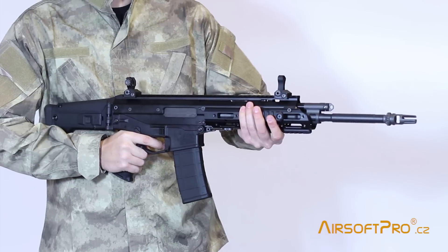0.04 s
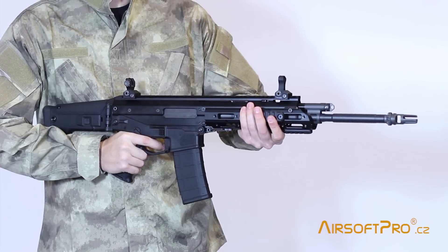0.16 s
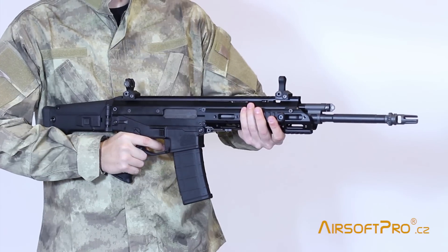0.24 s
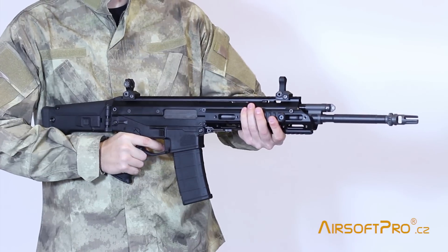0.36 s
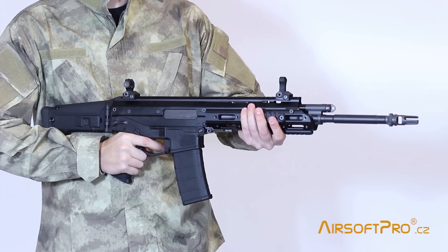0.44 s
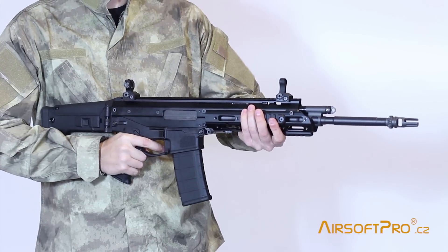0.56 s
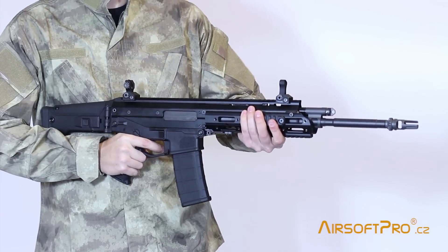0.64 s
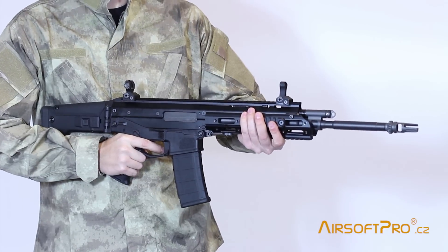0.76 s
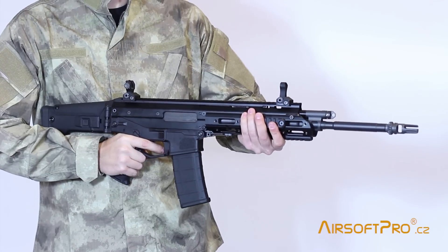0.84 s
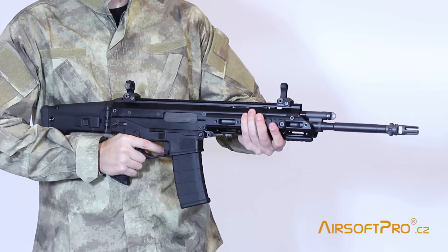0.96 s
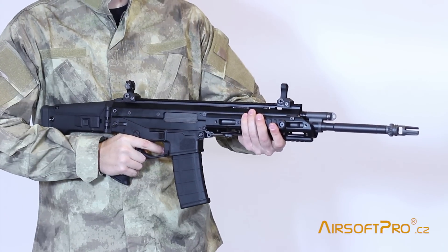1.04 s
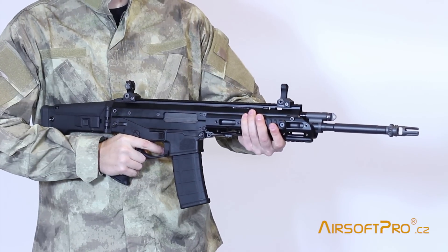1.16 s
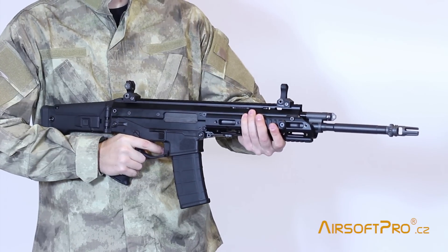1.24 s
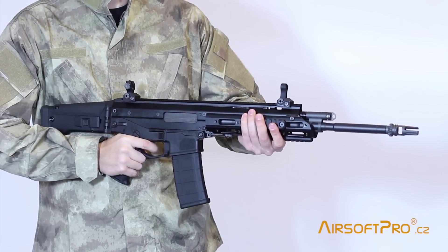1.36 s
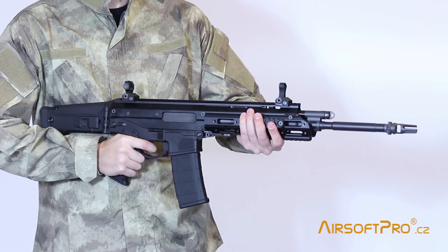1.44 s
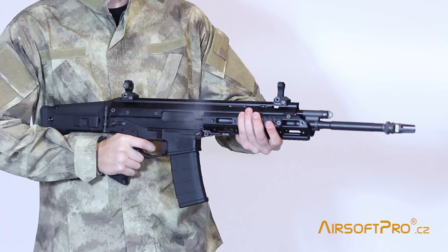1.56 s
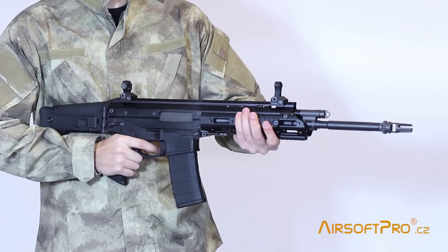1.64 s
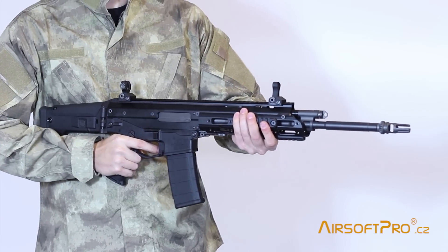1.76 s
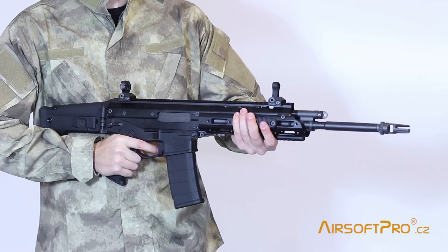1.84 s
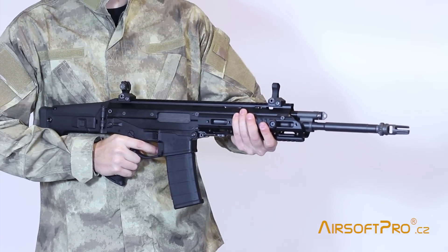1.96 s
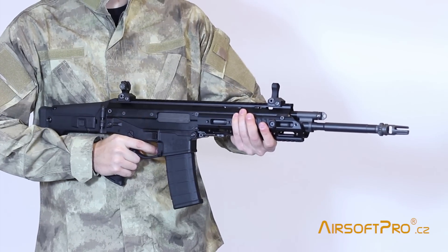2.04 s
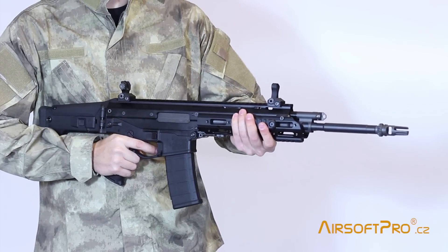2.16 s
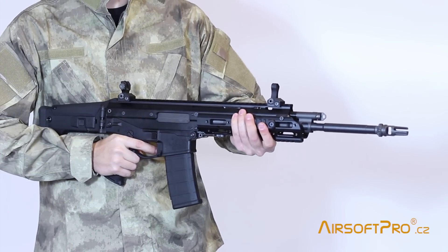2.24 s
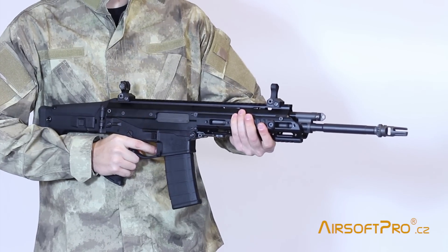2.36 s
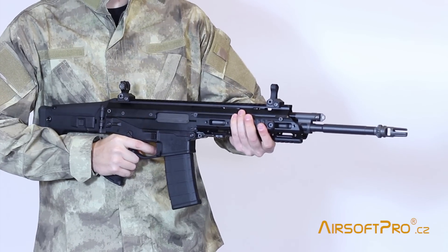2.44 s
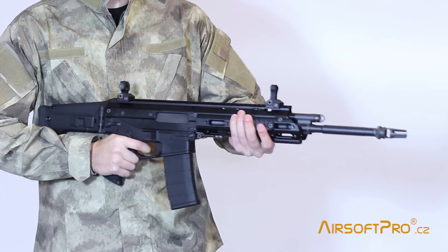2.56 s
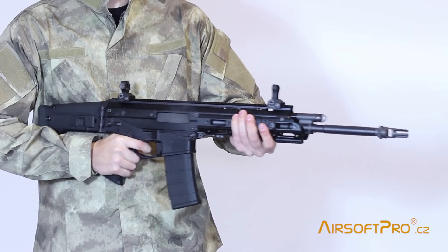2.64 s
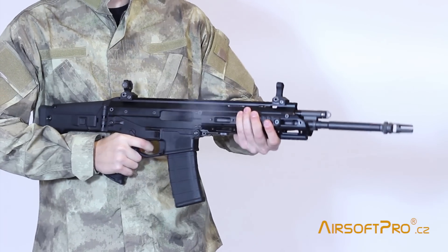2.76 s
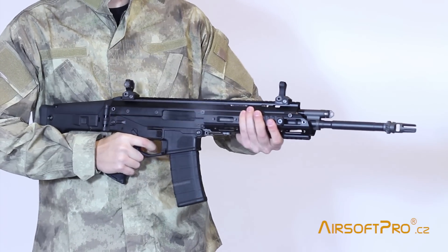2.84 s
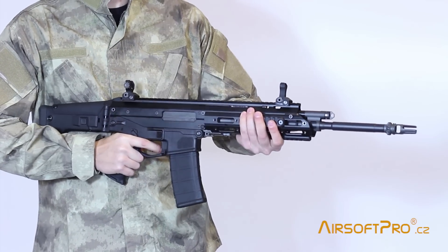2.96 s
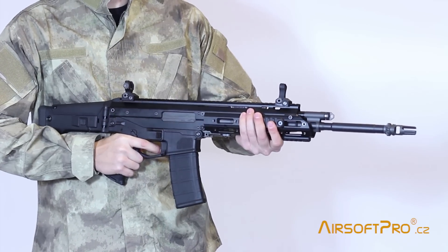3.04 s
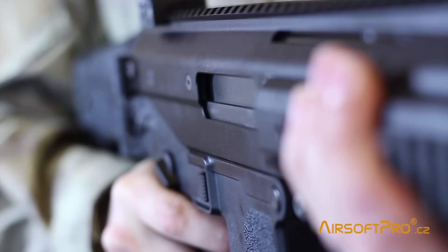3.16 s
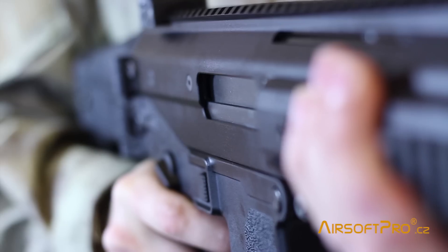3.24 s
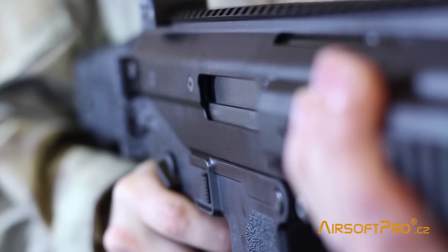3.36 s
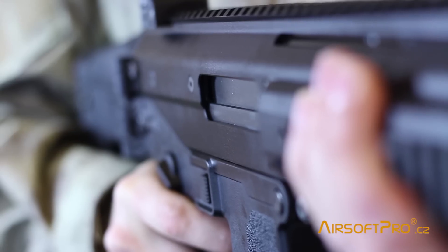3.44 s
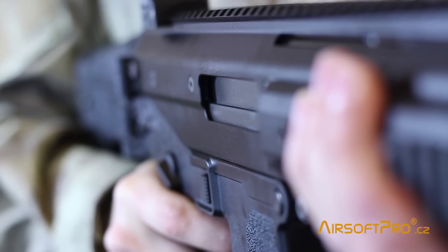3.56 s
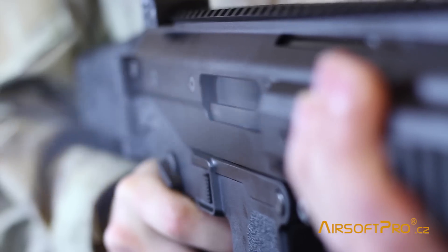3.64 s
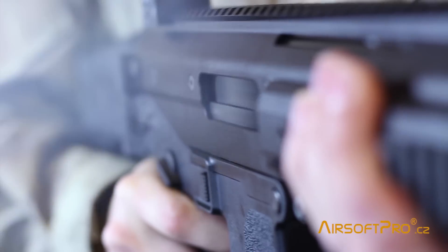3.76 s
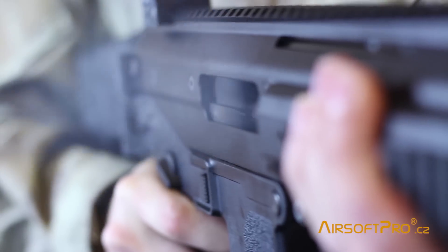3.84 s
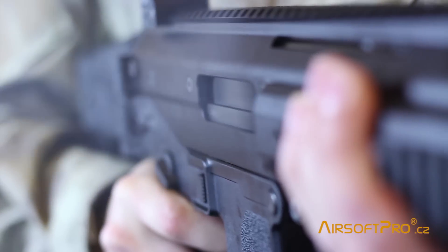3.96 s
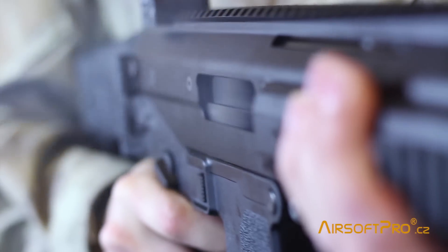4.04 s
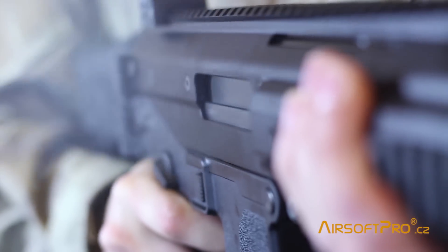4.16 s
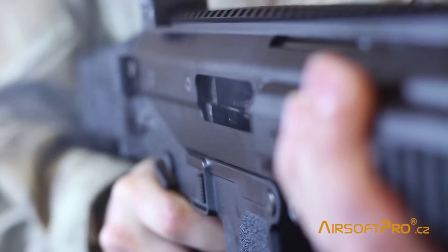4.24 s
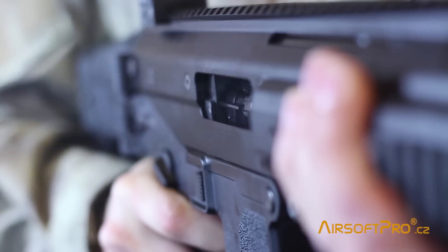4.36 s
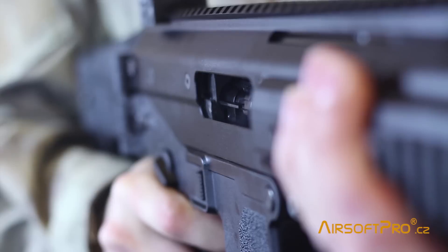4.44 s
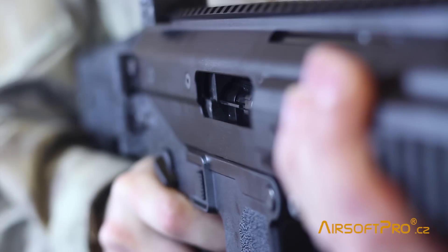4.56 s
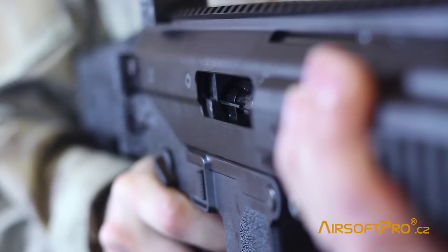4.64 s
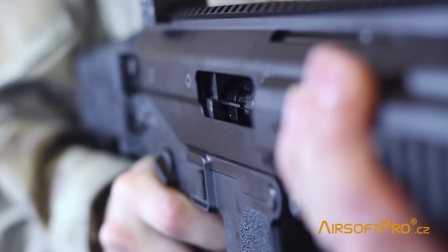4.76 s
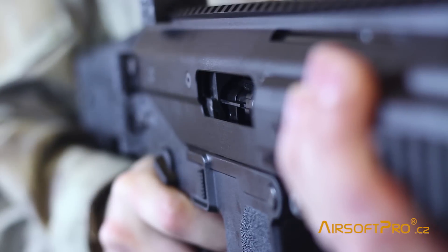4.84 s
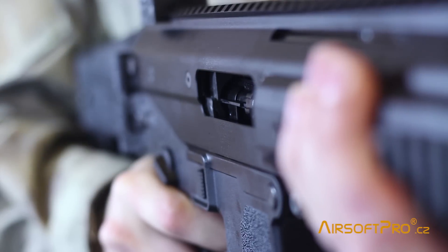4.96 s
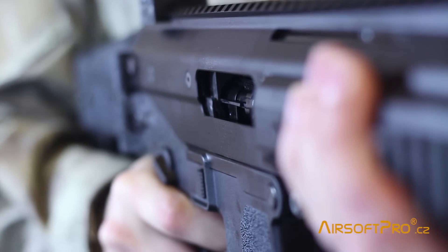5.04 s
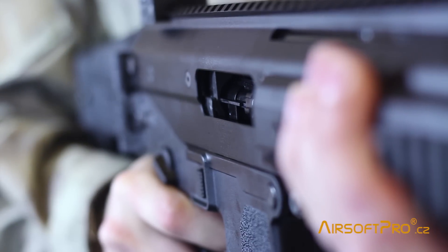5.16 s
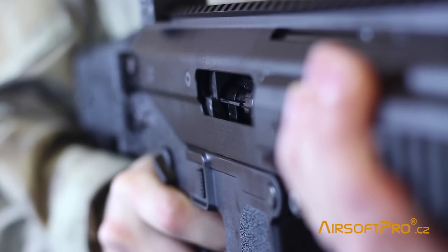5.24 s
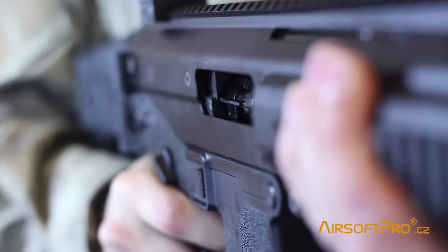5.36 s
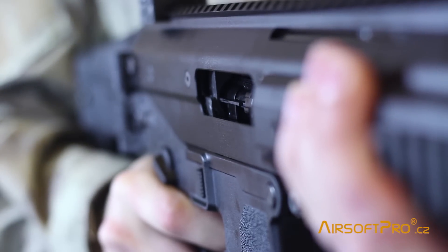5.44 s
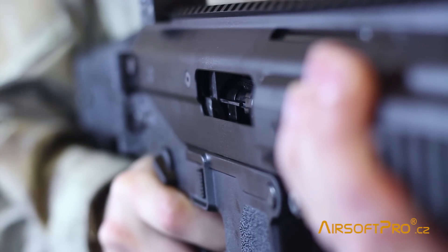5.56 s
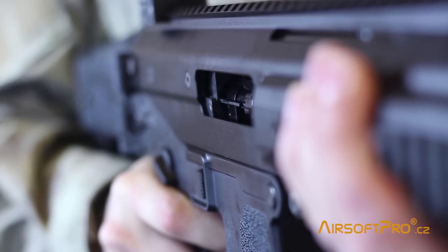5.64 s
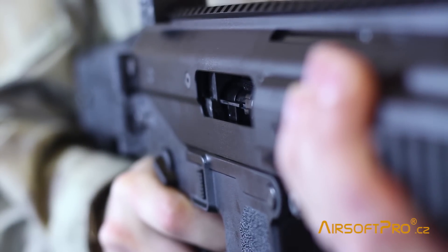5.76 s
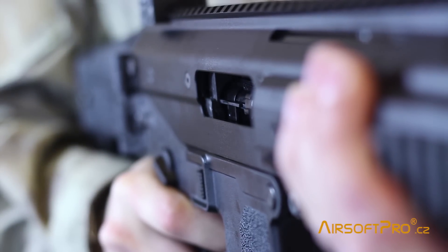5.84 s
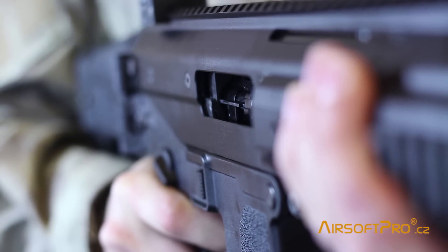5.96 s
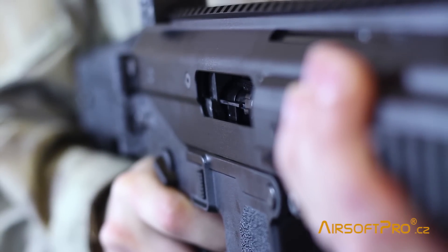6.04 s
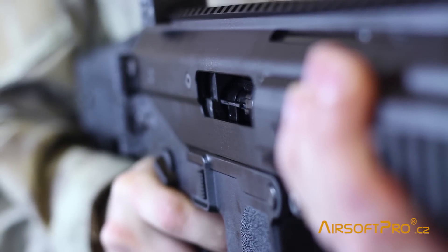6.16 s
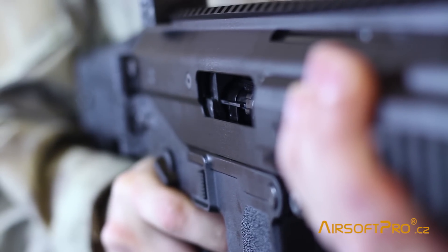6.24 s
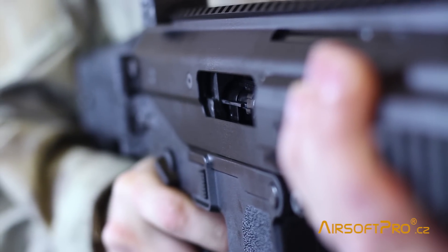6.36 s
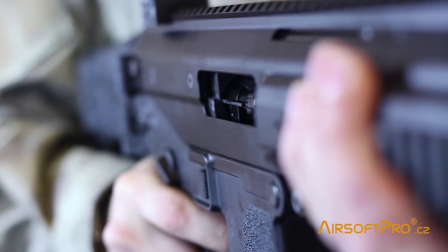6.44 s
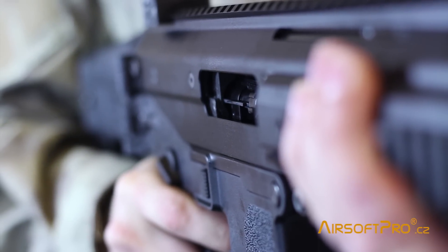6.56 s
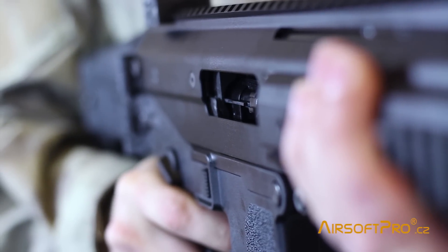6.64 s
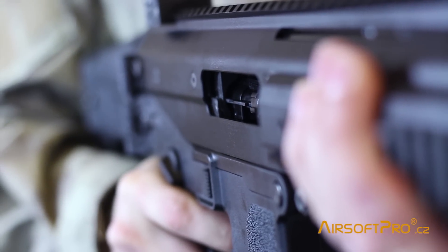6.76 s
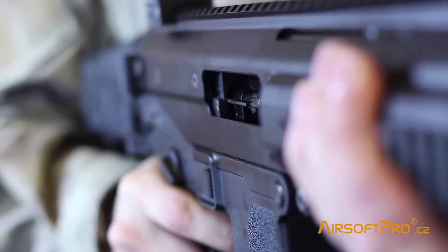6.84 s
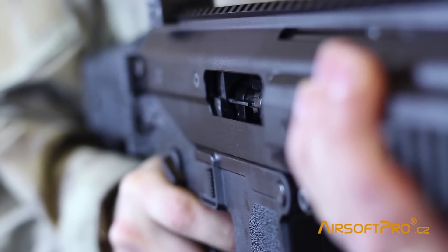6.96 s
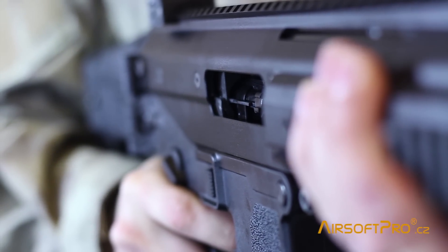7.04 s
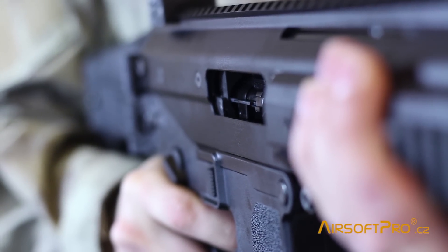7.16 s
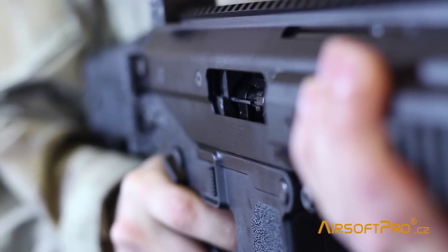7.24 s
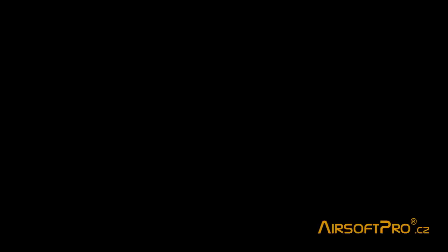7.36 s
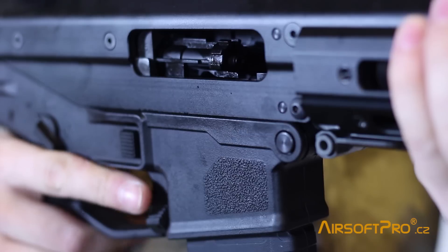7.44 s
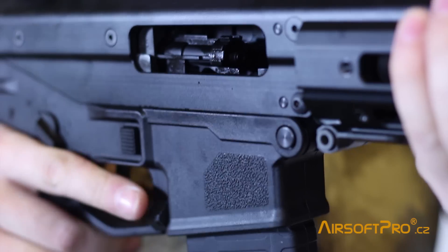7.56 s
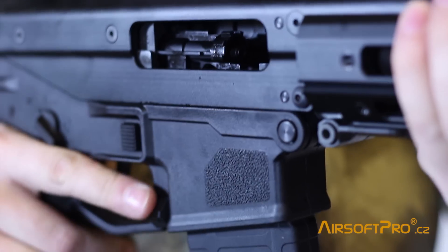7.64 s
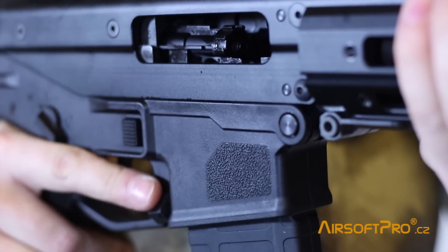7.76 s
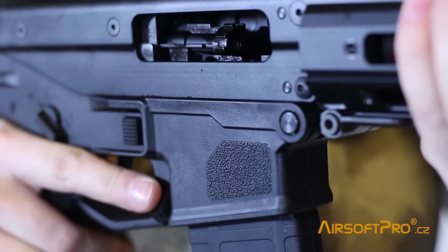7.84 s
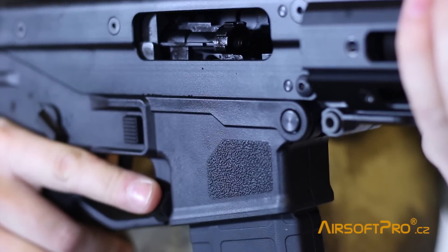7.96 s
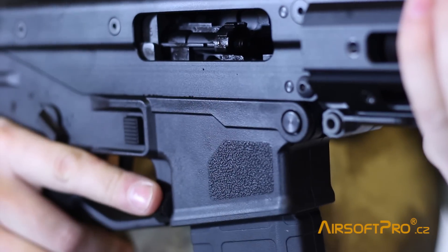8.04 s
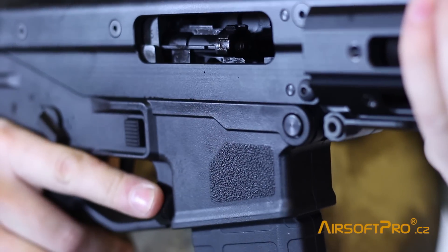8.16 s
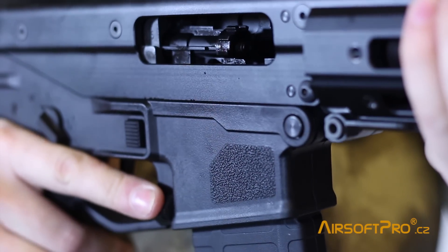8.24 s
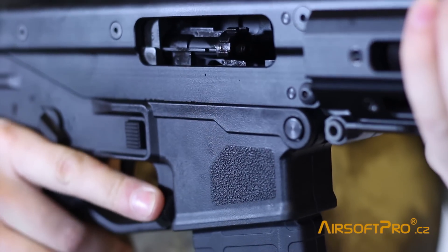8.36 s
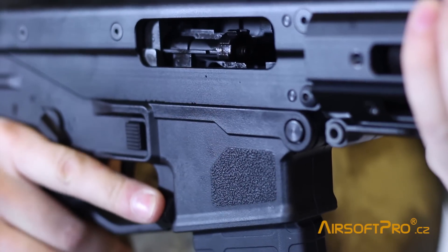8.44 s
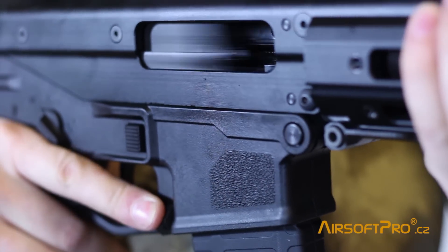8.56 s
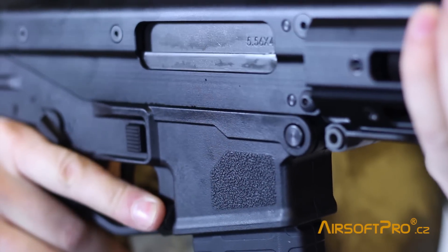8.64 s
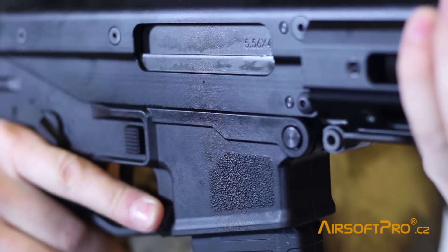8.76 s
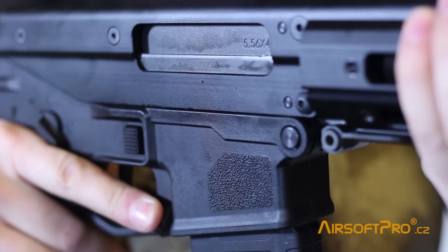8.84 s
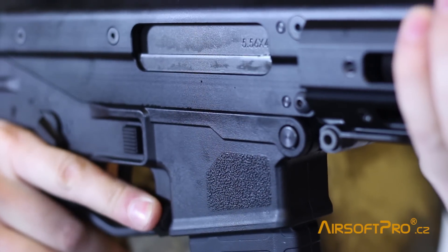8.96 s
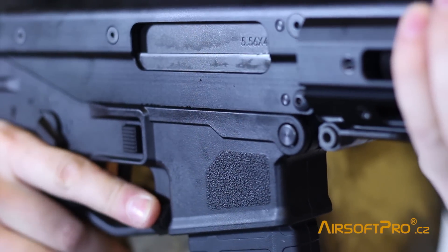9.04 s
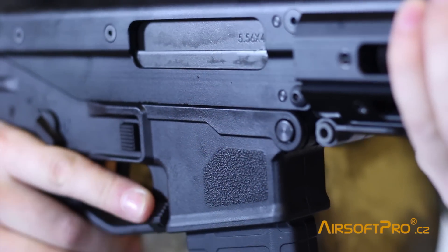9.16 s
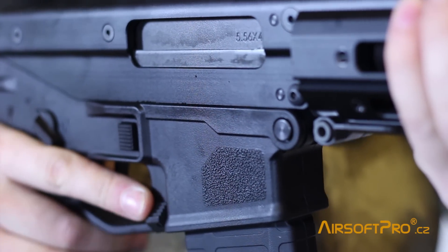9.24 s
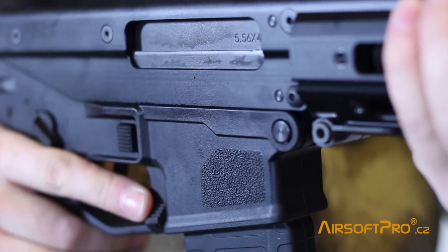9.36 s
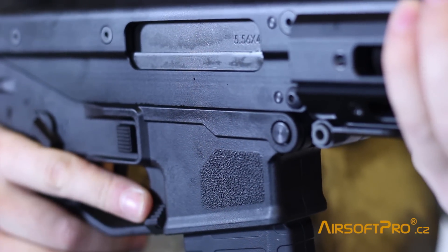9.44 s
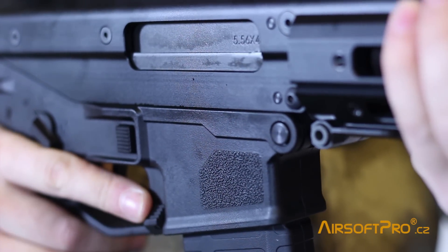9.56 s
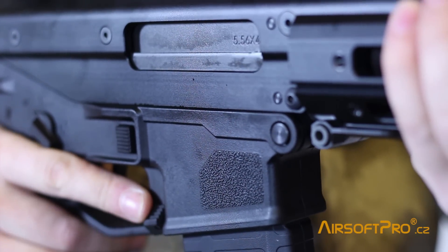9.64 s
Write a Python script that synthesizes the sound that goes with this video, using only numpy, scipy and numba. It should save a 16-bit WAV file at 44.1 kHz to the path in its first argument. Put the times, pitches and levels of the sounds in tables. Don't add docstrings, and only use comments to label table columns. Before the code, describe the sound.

Steady quiet hiss, then a rapid three-shot burst of metallic cracks, a few distant knocks, a five-shot burst, an abrupt cut, and a seven-shot burst closer to the microphone. The overloaded, squeezed level makes the room echo hang. Scattered ticks and hollow knocks thin out; after a tiny silence, cloth rustles, the bolt slams shut with a bright steel ring, and light handling clicks end it.

```python
import sys
import numpy as np
from scipy import signal
from scipy.fft import rfft, irfft
from scipy.io import wavfile
from scipy.ndimage import uniform_filter1d
from numba import njit

SR = 44100
rng = np.random.default_rng(int(sys.argv[2]) if len(sys.argv) > 2 else 0)


def dump_mix(stems):
    frames = np.atleast_2d(stems).T
    limited = np.clip(frames, -1, 1)
    pcm = np.round(limited * 32767).astype(np.int16)
    wavfile.write(sys.argv[1], SR, pcm)


def invert_db(level):
    return 10 ** (np.asarray(level, dtype=float) / 20)


N = 427769
CUT_S, GAP_S = 3.207, (7.408, 7.446)
SQUEEZE_DB = 18.5
NOTE_IN_ROOM_DB = -13

# (bolt home time [s], level [dB], delay to valve pop [s], pop level [dB], delay to rear stop [s])
BOLT_CYCLES = [(1.4519, -20.5, 0.014, -11, .028), (1.5209, -3.5, 0.02, -12, 0.037),
               (1.6091, -12, .0221, -13, .0405), (2.5613, -17, 0.0066, -1.5, 0.029),
               (2.6275, -10.5, .0228, -8.5, .0388), (2.7106, -18, 0.012, -12.5, .0376),
               (2.7878, -5.5, .0215, -13, .0345), (2.8793, -10, .0217, -14.5, .0327),
               (3.7047, -7.5, 0.014, -6.5, 0.024), (3.7749, -9, .009, -14, .0292),
               (3.862, -10, 0.0086, -14.5, 0.030), (3.9566, -6.5, .015, -7, .0313),
               (4.0511, -4.5, .0155, -5.5, .0335), (4.1478, -12, .0095, -14.5, 0.027),
               (4.2343, -6, .0154, -11.5, 0.0334)]
# (stop level [dB], stop note [Hz], delay to rebound [s], rebound level [dB],
# rebound note [Hz])
BOLT_STOPS = [(-2.5, 2100, .008, -6.5, 1100), (-6, 1100, .009, -8.5, 2400), (-4.5, 2200, 0.0055, -7, 1250),
              (-6, 2300, 0.0036, -8.5, 2300), (-3, 1250, 0.0074, -11, 2800), (-3, 1300, 0.008, -9, 2500),
              (-8.5, 1250, .015, -9, 2400), (-6, 1250, 0.013, -7.5, 2600), (-7, 1400, .005, -7, 2400),
              (-13.5, 520, .0086, -5, 2000), (-10, 1050, .0103, -6.5, 2210), (-10, 920, 0.014, -5, 2500),
              (-10, 1500, 0.014, -9, 2500), (-15.5, 1100, 0.016, -2.5, 1800), (-12.5, 2500, .011, -8, 2900)]
# (time [s], level [dB], bass [dB], treble [dB], note [Hz])
STRAY_BLOWS = [(1.4525, -18.5, -0.5, 3.5, 1101), (1.4528, -20, -8.5, 9.5, 8600),
               (1.4532, -16, -20, -10, 9200), (1.4599, -12, -17.5, -9, 4900), (1.6945, -13, -19.5, 7, 4300),
               (2.5642, -10.5, -10, -0.5, 2300), (2.5925, -14, -8.5, -8.5, 1200),
               (2.7275, -13, -8, -9, 2000), (2.986, -13, -20, -6, 3600), (3.7035, -10.5, -10, -7.5, 3100),
               (3.3, -14.5, -12, -0.5, 2300), (2.6355, -10.5, -22.5, -3, 4240),
               (2.7223, -19.5, -3.5, -4, 3100), (2.9339, -8.5, -14, -15, 2330),
               (2.9814, -6.5, -23, -3.5, 4003), (3.6985, -11.5, -15.5, -9, 3030),
               (3.8824, -19.5, -3, 3, 2310), (4.1, -10, -13.5, -5.5, 2310), (4.169, -18, 2.5, -7.5, 1000),
               (4.152, -16, -23, -5.5, 1800), (3.9474, -21.5, -21.5, -9, 2400),
               (4.0414, -15.5, -28, -10, 2310), (3.158, -57, -10, 15, 11000), (4.499, -61, -8, 15, 11500),
               (2.5665, -12.5, -9.5, 2, 4100), (4.3071, -28.5, -18, -10, 2100)]


def at(s):
    return int(s * SR)


def band(x, lo_hz, hi_hz, order=2):
    return signal.sosfilt(signal.butter(order, [lo_hz, min(hi_hz, .45 * SR)], "band", fs=SR, output="sos"), x)


def unit(x):
    return x / np.std(x)


def fade(x, t60):
    return signal.lfilter([1], [1, -1000 ** (-1 / (t60 * SR))], x)


def colour(x, table):
    hz, db = np.transpose(table)
    log_gain = np.log(invert_db(np.interp(np.log(np.linspace(1, SR / 2, 1025)), np.log(hz), db)))
    cepstrum = irfft(log_gain)
    cepstrum[1:1024] *= 2
    cepstrum[1025:] = 0
    response = irfft(np.exp(rfft(cepstrum)))
    return signal.oaconvolve(x, response[None], axes=1)[:, :N]


def ring(x, modes):
    out = 0
    for hz, db, t60 in modes:
        r = 1000 ** (-1 / (t60 * SR))
        swing = signal.lfilter([1], [1, -r * np.exp(2j * np.pi * hz / SR)], x).imag
        out = out + invert_db(db) * np.sqrt(1 - r) * swing
    return out


def grit(db, count):
    sizes = invert_db(db * np.minimum(rng.exponential(size=N // count + 1), 3))
    grains = np.repeat(sizes, count)[:N]
    return grains / np.sqrt(np.mean(grains ** 2))


def blows(rows, split_hz, crack_t60, rattle_t60, grit_db, gain_db=0., top_hz=15000, order=4):
    crack, rattle = np.zeros((2, 3, N))
    for s, db, bass_db, treble_db, rattle_db, *_ in rows:
        size = invert_db(db + gain_db + np.array([bass_db, 0, treble_db]))
        crack[:, at(s)] += size
        rattle[:, at(s)] += size * invert_db(rattle_db)
    grains = grit(grit_db, count=40)
    edges = [80, *split_hz, top_hz]
    contact = np.arange(4000) < 15
    out = 0
    for k in range(3):
        limits = edges[k], edges[k + 1]
        slower = (1.3, 1, .8)[k]
        shape = fade(fade(contact / 5, crack_t60 * slower), 0.00091) / 12
        noise = rng.standard_normal(N)
        loose = grains * fade(rattle[k], rattle_t60) * noise
        to_microphone = signal.oaconvolve(crack[k], shape)[:N] * noise + loose
        to_room = crack[k] * np.sqrt(np.sum(shape ** 2)) + loose
        norm = 1 / np.std(band(rng.standard_normal(SR), *limits, order=order))
        out = out + norm * band(np.array([to_microphone, to_room]), *limits, order=order)
    return out


def knocks(rows, t60, gain_db, top_hz=19000, rise_s=1e-5):
    out, t = np.zeros(N), np.arange(2000) / SR
    for s, db, *_, hz in rows:
        swell = (1 - np.exp(-t / rise_s)) ** 2 * 1000 ** (-t / t60)
        out[at(s):at(s) + len(t)] += invert_db(db + gain_db) * swell * np.sin(2 * np.pi * hz * t)
    return band(out, 130, top_hz, order=3) * invert_db(np.array([[0], [NOTE_IN_ROOM_DB]]))


def rattling(rows, rattle_db):
    return [(*r[:4], rattle_db, r[4]) for r in rows]


def cycles():
    # (bass [dB], treble [dB], rattle [dB], shell note [Hz] where it is not in the table)
    home_near, home_far = (-15, -1.5, -19, 2348.5), (-16, 2, -18, 2350.5)
    valve, rear, rebound = (-11.5, -4, -12.5, 2999.5), (-9.5, -6, -18.5), (-14, -6.5, -17.5)
    luck = np.clip(rng.standard_normal((len(BOLT_CYCLES), 2)), -1.5, 1.5)
    stray = np.exp(np.array((.03, .25)) * luck)
    rows = []
    for cycle, stop, (home_stray, valve_stray) in zip(BOLT_CYCLES, BOLT_STOPS, stray):
        s, db, valve_s, valve_db, rear_s = cycle
        rear_db, rear_hz, back_s, back_db, back_hz = stop
        home = home_near if s > CUT_S else home_far
        rows += [(s, db, *home[:3], home[3] * home_stray),
                 (s + valve_s, valve_db, *valve[:3], valve[3] * valve_stray),
                 (s + rear_s, rear_db, *rear, rear_hz),
                 (s + rear_s + back_s, back_db, *rebound, back_hz)]
    return rows + rattling(STRAY_BLOWS, rattle_db=-20.5)


def strokes():
    last_returns = (4, 14)
    rows = [(STRAY_BLOWS[k][0], 0.017, -33) for k in last_returns]
    for (s, _, valve_s, _, rear_s), stop in zip(BOLT_CYCLES, BOLT_STOPS):
        k = int(s > CUT_S)
        vent_s = rear_s - valve_s + stop[2] + 0.0053
        rows += [(s, (0.097, 0.024)[k], (-20, -28.5)[k]), (s + valve_s, vent_s, (-13, -14)[k])]
    return rows


def gas():
    # (time [s], pitch [Hz], level [dB], swoop [share of pitch], flutter [Hz])
    whistles = [
        (1.453, 9210, -16.5, .1, 85),
        (1.628, 7620, -24, .05, 84.95),
        (2.572, 7300, -20, .1, 85.2),
        (2.7194, 7150, -11.5, .02, 154),
        (2.7264, 7100, -11.5, .02, 155),
        (3.704, 7593, -9.5, -.05, 69.94),
        (3.783, 7500, -8, .3, 69.85),
        (3.869, 7316, -8, .2, 94.8),
        (3.977, 7300, -23.5, .1, 85),
        (4.158, 7280, -11, -.05, 85.16),
    ]
    slide, whistle, t = np.zeros(N), np.zeros(N), np.arange(5000) / SR
    waver = 1 + 0.017 * unit(band(rng.standard_normal(N), 60, 400))
    for s, length, db in strokes():
        slide[at(s):at(s + length)] += invert_db(db)
    dying = 1000 ** (-t / .045) + invert_db(-16) * 1000 ** (-t / .3)
    onset = np.minimum(t / .003, 1)
    for s, hz, db, swoop, flutter_hz in whistles:
        span = slice(at(s), at(s) + len(t))
        pitch_hz = hz * waver[span] * (1 - swoop * np.exp(-t / .002) - .3 * t)
        phase = 2 * np.pi * np.cumsum(pitch_hz) / SR
        flutter = 1 + 0.43 * np.sin(2 * np.pi * flutter_hz * t - 1.2)
        whistle[span] += invert_db(db + 7) * onset * dying * flutter * np.sin(phase)
    slide = np.convolve(slide, np.ones(200) / 200)[:N]
    hiss = unit(band(rng.standard_normal(N), 900, 9000))
    return invert_db(SQUEEZE_DB) * (whistle + slide * grit(1.7, count=60) * hiss)


def snaps():
    # (time [s], level [dB])
    sharp_snaps = [(1.4722, -10), (1.4808, -6), (1.5218, -6), (1.5433, -2), (1.5436, -4), (1.6321, 0),
                   (2.5712, -2), (2.6298, -10), (2.6515, -9), (2.6726, -10), (2.7396, -9), (2.7484, -6),
                   (2.7887, -11), (2.8099, -1), (2.8368, -11), (2.8803, -13), (2.9019, -8), (2.9813, -9),
                   (3.7661, -13), (3.8702, -9), (3.9728, -9), (4.067, -12), (4.1584, -7), (4.2509, -10),
                   (8.6262, -14), (8.667, -12)]
    out = np.zeros(N)
    for s, db in sharp_snaps:
        out[at(s)] = invert_db(db + SQUEEZE_DB + 21)
    return band(out, lo_hz=1000, hi_hz=8500, order=2) * invert_db(np.array([[0], [NOTE_IN_ROOM_DB]]))


def firing():
    # (pitch [Hz], level [dB], time to fade by 60 dB [s])
    fire_modes = [(1162, -22.5, 0.03), (1390, -21.5, 0.023), (2270, -24, 0.14), (4020, -23, 0.14),
                  (4970, -28, 0.12), (5740, -25, .18), (5850, -25, .15), (6750, -28, 0.11),
                  (7300, -25, 0.11)]
    # (pitch [Hz], level [dB])
    near_colour = [(60, -11), (200, -2.5), (500, -1.5), (1200, -2), (2500, -3), (5000, -2), (7500, 4),
                   (10000, -6.5), (13000, -19), (17000, -20.5)]
    shots = cycles()
    fire = blows(shots, split_hz=(1200, 4500), crack_t60=0.03, rattle_t60=0.15, grit_db=4.0, gain_db=SQUEEZE_DB)
    fire = fire + knocks(shots, t60=0.057, gain_db=SQUEEZE_DB + 1.0) + gas()
    return colour(fire + ring(fire, fire_modes), near_colour)


def bolt_slam():
    # (time [s], level [dB], bass [dB], treble [dB], note [Hz])
    slam_blows = [(8.5985, -22, -20.5, -13, 2000), (8.6005, -9.5, -27.5, -3, 1626),
                  (8.603, -12.5, -22, -6.5, 1748), (8.6095, -18.5, -18.5, -2, 1895),
                  (8.612, -18, -17, -5.5, 2270), (8.617, -16, -19, -11, 1790),
                  (8.621, -24.5, -16.5, -8.5, 1906), (8.6258, 0, -27, -1, 1462),
                  (8.627, -9, -18, -1.5, 3473), (8.6295, -15, -19.5, -8.5, 1493),
                  (8.635, -24, -13, -2, 1570), (8.651, -17, -7, 6.5, 1326),
                  (8.6635, -19.5, -7.5, 4.5, 3170), (8.6665, 9, -12.5, 9.5, 1409),
                  (8.685, -27, -15.5, 6.5, 3314)]
    shut = rattling(slam_blows, rattle_db=-20.5)
    slam = blows(shut, split_hz=(1000, 2700), top_hz=13500, crack_t60=0.032, rattle_t60=0.048,
                 grit_db=-2.5, gain_db=SQUEEZE_DB - 18.0)
    return slam + knocks(shut, t60=0.012, gain_db=SQUEEZE_DB - 8.5)


def handling():
    # (time [s], level [dB], treble [dB], note [Hz])
    catch_clicks = [(3.671, -43, -13, 2500), (6.20, -54, -15, 1450), (6.246, -43, -20, 1256),
                    (6.285, -47.5, -19, 1380), (6.287, -50, -9.5, 2900), (7.839, -56, -10, 3260),
                    (8.464, -51, -31, 1760), (8.483, -49, -30, 1760), (9.1265, -37.5, -12, 715),
                    (9.127, -40, -20, 1730), (9.139, -37.5, -12, 600), (9.148, -38, -20, 1510),
                    (9.137, -27.5, -4, 1750), (9.161, -44, -28, 1290)]
    # (time [s], level [dB], note [Hz])
    trigger_clicks = [
        (1.435, -42, 2300),
        (1.440, -37, 2500),
        (1.4495, -13, 4100),
        (2.5575, -11, 2250),
        (3.684, -37, 4000),
        (3.693, -34, 3300),
        (8.590, -38, 2200),
        (8.594, -25, 2000),
    ]
    clicks = [(s, db, -5, treble_db, -16, hz) for s, db, treble_db, hz in catch_clicks]
    clicks += [(s, db, -10.5, -9.5, -14.5, hz) for s, db, hz in trigger_clicks]
    cracks = blows(clicks, split_hz=(1000, 3200), crack_t60=0.013, rattle_t60=0.14, grit_db=1.0, gain_db=-9.0)
    return cracks + knocks(clicks, t60=0.036, gain_db=-3.5)


def rifle():
    # (pitch [Hz], level [dB], time to fade by 60 dB [s])
    slam_modes = [(1300, -19, .03), (1950, -21, .045), (3350, -18, .04), (4000, -16, .1), (4320, -21, .1),
                  (5010, -24, .12), (5690, -17, .16), (5740, -15, .22), (5800, -18, .16), (7780, -15, .12),
                  (2050, -38, .6)]
    # (pitch [Hz], level [dB])
    slam_colour = [(100, -18.5), (400, -5), (1300, -0.5), (3300, 0.5), (6000, 1.5), (8000, 1),
                   (11000, -17.5), (17000, -28.5)]
    # (time [s], level [dB], pitch [Hz])
    stock_booms = [
        (1.4526, -29.5, 301.2),
        (3.698, -19.5, 290.6),
        (8.666, -29, 250),
        (8.667, -32, 140),
    ]
    fire = firing()
    slam = bolt_slam() + handling()
    steel = fire + colour(slam + ring(slam, slam_modes), slam_colour)
    return steel + snaps() + knocks(stock_booms, t60=0.11, gain_db=SQUEEZE_DB)


def puffs():
    # (time [s], left level [dB], right level [dB])
    jet_puffs = [(1.45, -52.5, -44.5), (2.563, -38, -44), (3.702, -52, -32.5), (3.79, -32, -42.5),
                 (3.87, -43, -30), (3.969, -43, -28.5), (4.065, -50.5, -30.5), (4.16, -30, -59),
                 (4.248, -52, -32), (4.726, -72, -61), (8.625, -62, -45.5), (8.663, -41, -35)]
    s, *db = np.transpose(jet_puffs)
    push = np.zeros((2, N))
    push[:, (s * SR).astype(int)] = invert_db(np.array(db) + SQUEEZE_DB)
    return fade(push, 0.22) * unit(band(rng.standard_normal((2, N)), 42, 150))


def far_knocks():
    # (time [s], level [dB], bass [dB], treble [dB], left minus right [dB])
    far_early = [(2.1956, -14, -14, -8, -7), (2.2018, -15.5, -22, -13, -10), (2.2086, -15, -26, -7, -2),
                 (2.216, -18, -18.5, -14, 0.0), (2.232, -21, -15.5, -15, -1.5),
                 (2.257, -23.5, -18, -13.5, -1.5), (2.4225, -29, -2, -16, -14),
                 (2.4276, -23, -7.5, -9, -1.5), (2.4442, -27, -5, -15, -4.5), (2.458, -25.5, -8, -15, -2),
                 (2.5132, -20, -9.5, -24, -3), (3.105, -20, -10, -11.5, 0.0),
                 (3.1574, -27.5, -11.5, 2.5, -2)]
    far_late = [(4.4303, -10.5, -10, -4, -3), (4.4582, -22.5, -5, 3.5, 3.5), (4.4944, -23, -12, 4.5, -0.5),
                (4.5029, -15.5, -6.5, -19, -1), (4.6128, -22.5, -8.5, -10, -2.5),
                (4.6557, -20, -13, -12.5, -1.5), (4.6735, -20, -11, -7, -2),
                (4.7224, -14.5, -12, -9.5, -4.5), (4.7321, -14.5, -9, -5.5, 0),
                (4.7803, -18.5, -11, -19, -2), (4.8193, -22.5, -8, -14, -2.5),
                (4.8725, -17, -13, -19, -3.5), (4.8826, -22.5, -12, -8.5, 1), (4.8934, -20, -16, -15, -3.5),
                (4.9794, -22, -10, -12.5, -3), (5.1028, -20.5, -10.5, -4, -8), (5.1161, -20, -7.5, 0, -1.5),
                (5.148, -15, -8.5, -23, -4.0), (5.2279, -26.5, -11, -17, -4.5),
                (5.2847, -21, -14, -23, -1.5), (5.3123, -19.5, -12, -11, -9), (5.323, -20, -8.5, -8.5, -1),
                (5.3693, -30, -5.5, -10, -5), (5.4158, -16.5, -15, -17, -6),
                (5.424, -18.5, -11.5, -6, -2.5), (5.4862, -21.5, -10, -13, -2), (5.5787, -21, 2, -10, 1),
                (5.6299, -28, -0.5, -8, -1), (5.725, -17.5, -11, -7.5, -6), (5.7334, -33, -2, -3, -2.5),
                (5.7983, -31.5, 1.5, -14, -3), (5.8571, -33.5, 1, -11, -3)]
    # (pitch [Hz], level [dB])
    far_colour = [(60, -39), (130, -18.5), (250, -9), (500, -7.5), (1200, -6.5), (1800, -6.5), (2400, -9),
                  (3600, -11.5), (4300, -12), (6000, -14.5), (8000, -19), (12000, -27)]
    # (time [s], level [dB], note [Hz])
    pellet_ticks = [(4.494, -9, 3570), (4.4952, -12, 3900), (4.3, -19.5, 3900), (5.3125, -17, 2405),
                    (5.62, -24.5, 3100), (5.115, -18, 3640), (5.116, -22, 5000), (5.738, -24, 2500),
                    (5.488, -24, 2400), (5.428, -18, 2620), (5.49, -23, 3200), (5.738, -17, 3380),
                    (4.7228, -11, 800), (4.4, -16, 1000), (1.8, -13, 2200), (5.44, -17, 1800),
                    (5.104, -22, 3370), (5.149, -21, 1700), (5.156, -20, 1600), (5.286, -34, 1700),
                    (5.323, -19, 1300), (5.417, -19, 1260), (5.5775, -28, 2400), (2.197, -20, 1200)]
    # (time [s], level [dB], note [Hz])
    hollow_boards = [
        (2.43, -27.5, 540),
        (2.444, -27, 650),
        (5.579, -24, 530),
        (5.123, -24, 500),
        (3.1, -31, 600),
        (5.632, -18.5, 347),
        (4.7228, -16, 723),
        (4.73, -15, 231),
        (4.8741, -16.5, 840),
    ]
    rows = np.array([(s, db, 8.5 + bass_db, 5 + treble_db, -4.5, pan)
                     for s, db, bass_db, treble_db, pan in far_early + far_late])
    dull = blows(rows[:, :5], split_hz=(900, 3650), top_hz=8740, order=5, crack_t60=0.062, rattle_t60=0.16,
                 grit_db=1.5, gain_db=-8.5)
    ticks = knocks(pellet_ticks, t60=0.0075, gain_db=6.0, top_hz=9100, rise_s=.0002)
    boards = knocks(hollow_boards, t60=0.067, gain_db=-2.5)
    latest = np.clip(np.searchsorted(rows[:, 0], np.arange(N) / SR) - 1, 0, None)
    return colour(dull, far_colour) + ticks + boards, rows[latest, 5]


def room(x, side_db, delay_s):
    # (middle pitch [Hz], time to fade by 60 dB [s], level [dB])
    octaves = [(126, 0.33, -1), (250, 0.42, 1), (495, 0.48, 3), (990, 0.38, 6.5), (2000, 0.39, 6),
               (3950, 0.38, 4.5), (7750, 0.3, 1.5), (14000, 0.11, 11)]
    air_top_hz = 10070
    t = np.arange(SR) / SR
    echo = 0
    for hz, t60, db in octaves:
        top_hz = hz * np.sqrt(2)
        if hz < air_top_hz:
            top_hz = min(top_hz, air_top_hz)
        noise = band(rng.standard_normal((2, SR)), hz / np.sqrt(2), top_hz, order=3 + 3 * (hz > 5000))
        echo = echo + invert_db(db) * 1000 ** (-t / t60) * noise
    echo = echo * np.clip(t / delay_s - 1, 0, 1) / np.sqrt(np.sum(echo ** 2) / 2)
    mid, side = (signal.oaconvolve(x, e)[:N] for e in echo)
    return mid + invert_db(side_db) * side * np.array([[1], [-1]])


def rustle():
    # (time [s], level [dB])
    cloth_swells = [
        [(0, -58), (.15, -62.5), (.4, -66.5)],
        [(7.45, -63), (7.55, -54), (7.65, -52.5), (7.8, -59), (7.95, -67)],
        [(9.15, -56), (9.25, -50), (9.38, -65)],
    ]
    t = np.arange(N) / SR
    swell = sum(invert_db(np.interp(t, *np.transpose(c), left=-150, right=-150)) for c in cloth_swells)
    fibres = np.repeat(invert_db(1.5 * rng.exponential(size=N // 200 + 1)), 200)[:N]
    fibres = uniform_filter1d(fibres, size=100)
    cloth = swell * unit(fibres * band(rng.standard_normal((2, N)), 370, 5500))
    squeaking = (t > 6.32) * (t < 6.67)
    slips = (rng.random(N) < 110 / SR) * squeaking * rng.exponential(size=N)
    squeak = invert_db(-71) * fade(slips, .03) * unit(band(rng.standard_normal(N), 12400, 13400))
    return cloth + squeak


def floor():
    # (pitch [Hz], level [dB per Hz])
    hiss_tone = [(15, -46.5), (25, -12.5), (101, -4.5), (264, -6), (301, -5), (326, -9.5), (404, -8),
                 (749, -12), (833, -10.5), (11200, -22), (13500, -30), (15000, -60)]
    # (pitch [Hz], level [dB])
    hum_tones = [(102.3, -72.5), (301.5, -78.5)]
    hiss = unit(colour(rng.standard_normal((2, N)), hiss_tone)) * np.sqrt(2) * invert_db(-59.5)
    t = np.arange(N) / SR
    return hiss + sum(np.sqrt(2) * invert_db(db) * np.sin(2 * np.pi * hz * t) for hz, db in hum_tones)


def scene():
    near, wet = rifle()
    (far, far_wet), pan_db = far_knocks()
    wet[at(3.5):] *= invert_db(-4.5)
    scattered = near * unit(band(rng.standard_normal(N), 60, 300))
    side = invert_db(-5) * band(scattered, lo_hz=2600, hi_hz=7100) + invert_db(2.0) * band(scattered, lo_hz=7060, hi_hz=17820)
    n = np.arange(N)
    turn_db = np.where((n > at(CUT_S)) & (n < at(GAP_S[0])), -4, -.8)
    sound = near * invert_db(np.array([turn_db, -turn_db]) / 2) + side * np.array([[1], [-1]])
    sound += invert_db(-2.0) * room(wet, side_db=-5.5, delay_s=0.0013)
    sound += far * invert_db(np.array([pan_db, -pan_db]) / 2)
    sound += invert_db(3.5) * room(far_wet, side_db=-6.0, delay_s=0.0087) + puffs()
    t = n / SR
    sound *= np.where(t < CUT_S + .46, np.clip((CUT_S - t) / .002, 0, 1), 1)
    return sound + rustle() + floor()


@njit
def gain_control(level_db, top_db, attack, creep_db):
    out, g = np.empty(len(level_db)), 0.
    for i in range(len(level_db)):
        want = top_db - level_db[i]
        if want < g:
            g = g + attack * (want - g)
        else:
            g = min(g + creep_db, 0.)
        out[i] = g
    return out


def top_cut(x):
    return signal.sosfilt(signal.butter(12, 15950, fs=SR, output="sos"), x)


def record(dry):
    level_db = 20 * np.log10(np.max(np.abs(dry), axis=0) + 1e-9)
    gain_db = gain_control(level_db, top_db=-12.5, attack=0.014, creep_db=150 / SR)
    gain_db[at(CUT_S):at(CUT_S + .4)] = 0
    x = np.clip(dry * invert_db(gain_db), -1.05, 1.05)
    x[:, at(GAP_S[0]):at(GAP_S[1])] *= invert_db(-54.5)
    return top_cut(x)


dry = scene()
out = record(dry)
dump_mix(out)
```